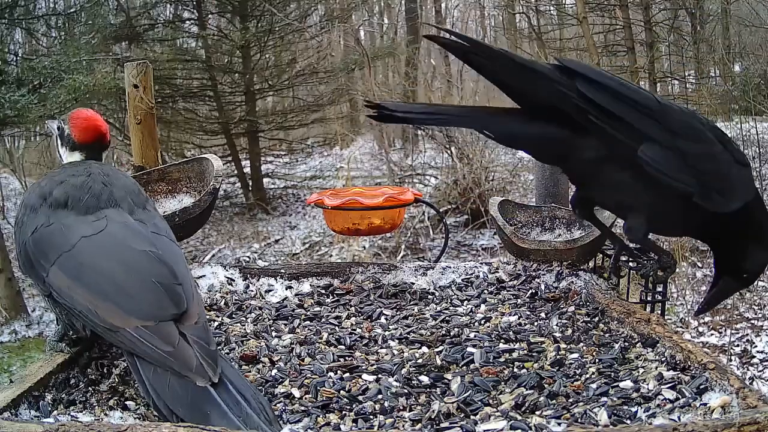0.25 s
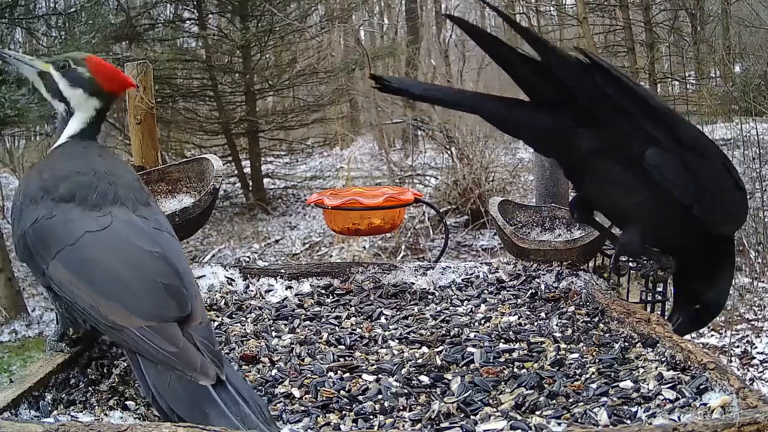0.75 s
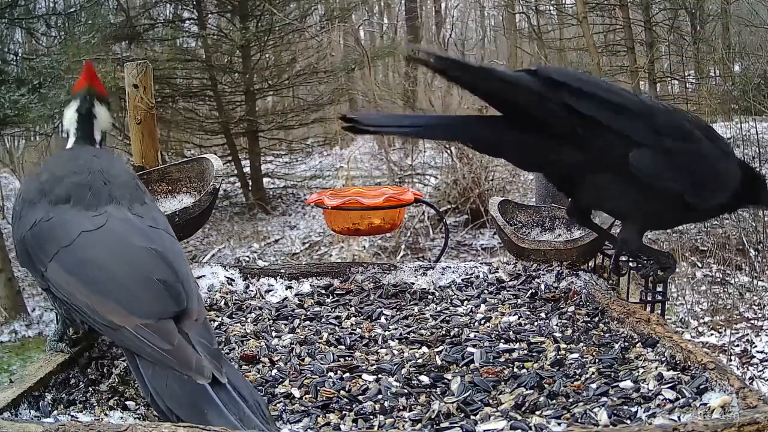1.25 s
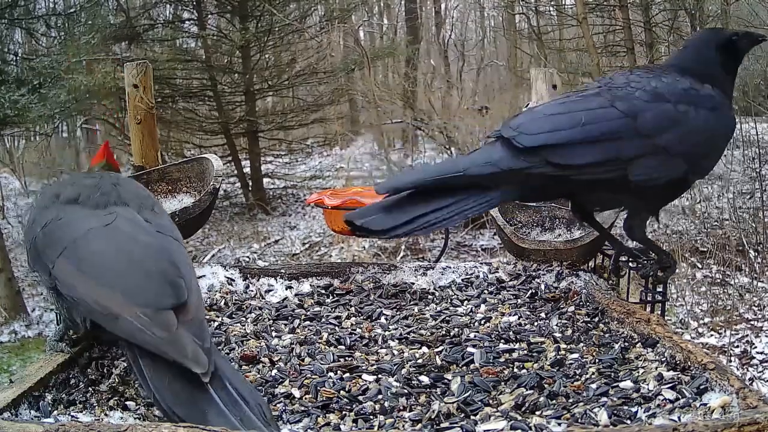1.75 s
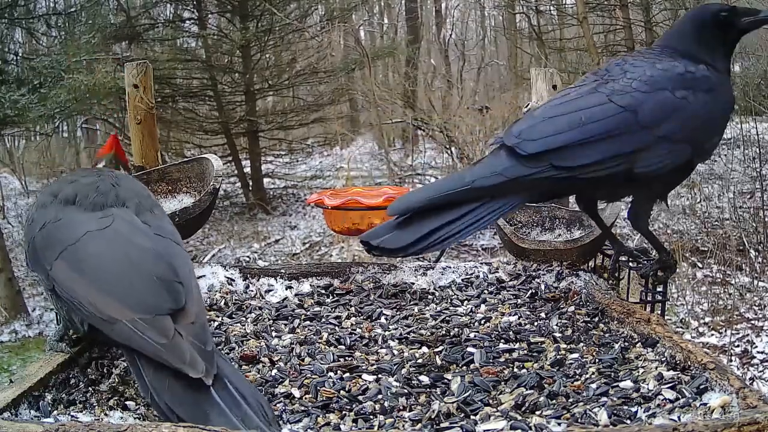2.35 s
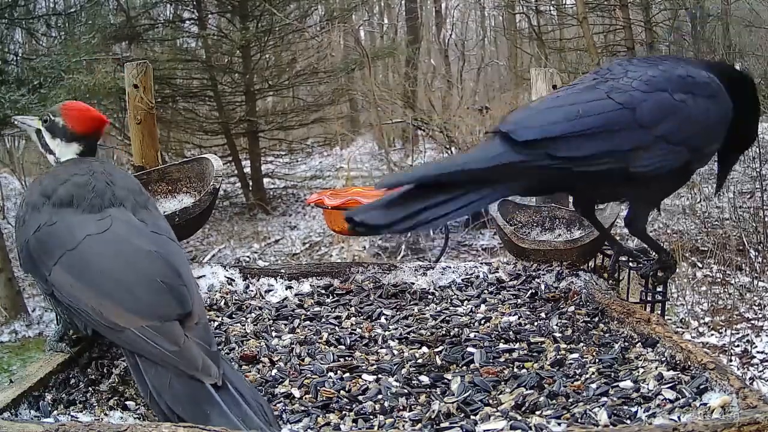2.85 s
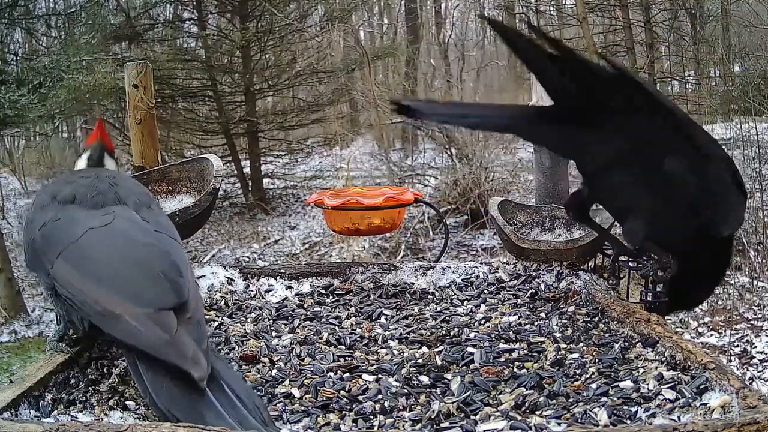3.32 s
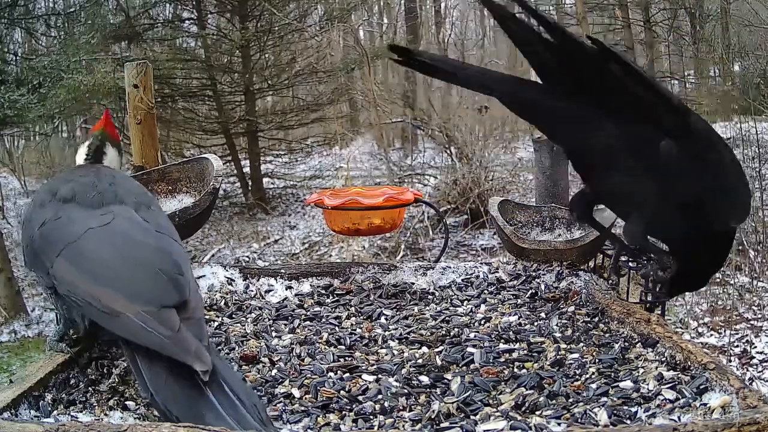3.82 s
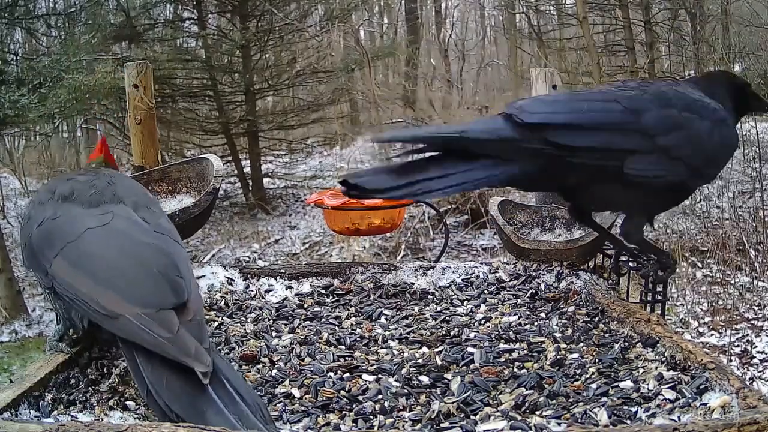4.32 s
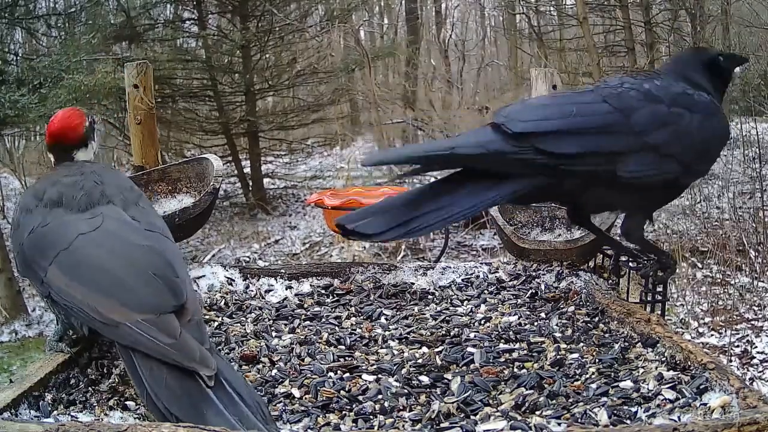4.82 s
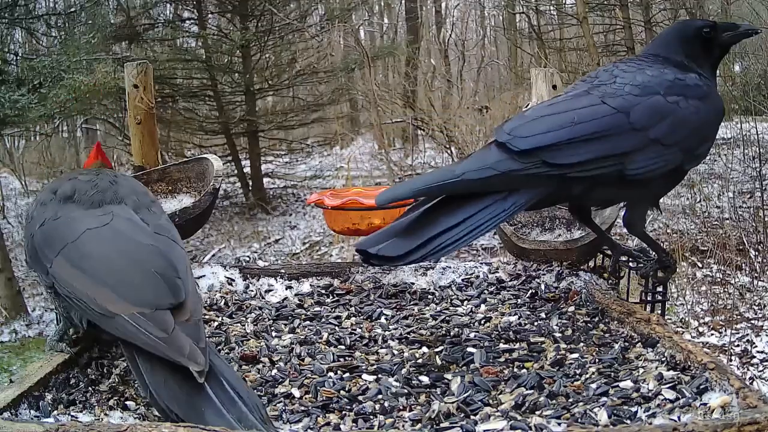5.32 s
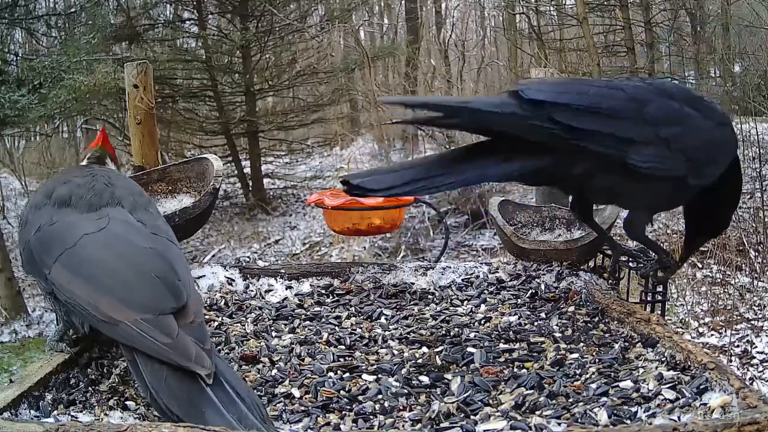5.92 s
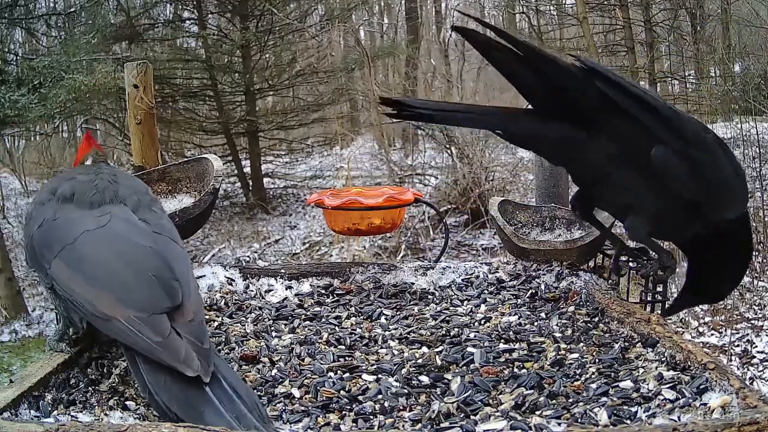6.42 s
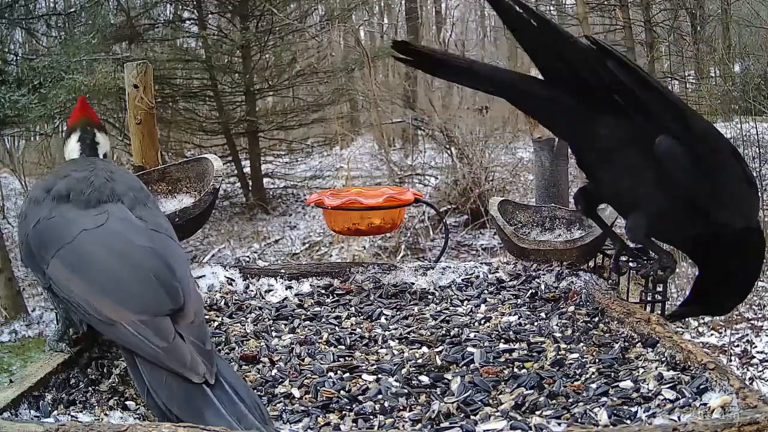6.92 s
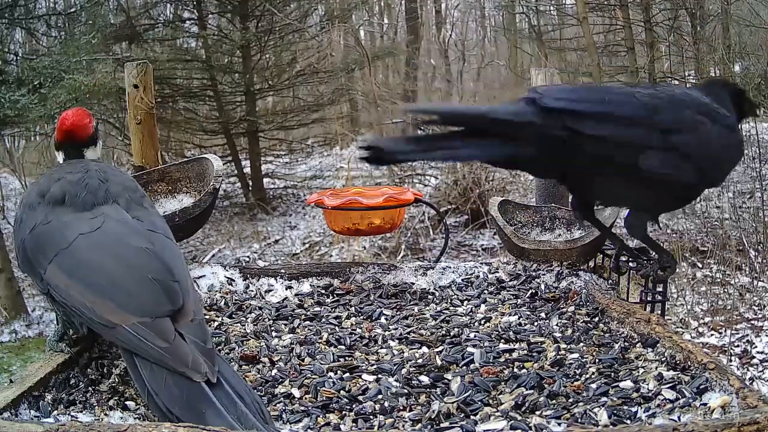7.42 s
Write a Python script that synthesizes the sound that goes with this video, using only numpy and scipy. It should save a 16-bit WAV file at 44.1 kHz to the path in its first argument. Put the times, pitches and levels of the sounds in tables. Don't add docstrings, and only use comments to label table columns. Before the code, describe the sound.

Close wooden pecks and loose rattling from a winter feeding platform come in uneven clusters, separated by quiet hiss, low rumble and tiny far-off chirps.

```python
import sys
import numpy as np
from scipy import signal
from scipy.fft import rfft, irfft, dct, next_fast_len
from scipy.io import wavfile
from scipy.ndimage import uniform_filter1d, map_coordinates

SR = 44100
rng = np.random.default_rng(int(sys.argv[2]) if len(sys.argv) > 2 else 0)


def waveform_to_disk(signal):
    frames = np.transpose(np.atleast_2d(signal))
    scaled = np.clip(frames, -1, 1) * 32767
    samples = np.round(scaled).astype(np.int16)
    wavfile.write(sys.argv[1], SR, samples)


def convert_level_to_amplitude(level_db):
    exponent = np.asarray(level_db, float) / 20
    return 10 ** exponent


N = 337806


def wobble(rate):
    knots = rng.standard_normal(int(N * rate / SR) + 4)
    return map_coordinates(knots, [np.arange(N) * rate / SR])


def coloured_noise(spectrum):
    m = next_fast_len(N + 8192)
    f, db = np.transpose(spectrum)
    log_hz = np.log(np.fft.rfftfreq(m, 1 / SR) + 1)
    gain = convert_level_to_amplitude(np.interp(log_hz, np.log(f + 1), db, -120, -120))
    x = irfft(rfft(rng.standard_normal(m)) * gain, m)[:N]
    return x / np.std(x)


def place(times, rows):
    at = np.round(np.asarray(times) * SR).astype(int)[:, None] + np.arange(rows.shape[1])
    return np.bincount(at.ravel(), rows.ravel(), N + SR)[:N]


def unfold(events, pattern, column):
    rows = []
    for event in events:
        for delay, *parts_db in pattern:
            rows.append((event[0] + delay, *(event[column] + np.array(parts_db))))
    return rows


def struck(events, groups, rise):
    s, *levels = np.transpose(events)
    t, rows = np.arange(SR // 2) / SR, 0
    for db, modes in zip(levels, groups):
        for hz, mode_db, t60 in modes:
            size, detune, turn = rng.standard_normal((len(s), 3)).T[:, :, None]
            swing = np.sin(2 * np.pi * hz * (1 + 0.014 * detune) * t + 1.01 * turn)
            build_up = 1 - np.exp(-(t * hz / rise) ** 2)
            decay = convert_level_to_amplitude(db[:, None] + mode_db + 1.35 * size - 60 * t / t60)
            rows = rows + decay * swing * build_up
    return place(s, rows)


# f/Hz, level/dB per Hz
TRAFFIC_SPECTRUM = [(88, -40), (150, 2), (194, -15), (281, 0.5), (322, -5.5), (364, -2.5), (461, -2.5),
                    (571, 0.5), (837, -16), (1340, -11.5), (1440, -9.5), (1620, -23), (2200, -36),
                    (2860, -56), (4840, -120)]


def far_traffic():
    level_db = -60.5 - 0.2663 * np.arange(N) / SR
    return convert_level_to_amplitude(level_db + 0.85 * wobble(4.775)) * coloured_noise(TRAFFIC_SPECTRUM)


# t/s, level/dB
POST_STIR = [(0.0, -49.5), (1.13, -49), (1.34, -41), (1.75, -55.5), (2.3, -52.5), (2.9, -52), (3.37, -46.5),
             (3.5, -43.5), (3.92, -49), (4.4, -52), (5.01, -51), (5.5, -52.5), (5.91, -52), (6.47, -48.5),
             (7.0, -49.5), (7.3, -53), (7.66, -50.5)]


def post_stir():
    s, db = np.transpose(POST_STIR)
    return np.interp(np.arange(N) / SR, s, db)


# f/Hz, level/dB per Hz
RUMBLE_SPECTRUM = [(18, -24), (30, 9), (43, -4.5), (97, -9), (139, -20.5), (160, -23), (250, -21.5),
                   (320, -47.5), (550, -120)]


def post_rumble(stir_db):
    return convert_level_to_amplitude(stir_db + 1.8 * wobble(9)) * coloured_noise(RUMBLE_SPECTRUM)


# f/Hz, level/dB per Hz
HISS_SPECTRUM = [(1000, -16), (1700, 0), (3350, -4), (5280, -4.5), (5590, -4.5), (6300, -4), (10300, -2.5),
                 (11400, -3.5), (12400, -4.5), (14800, -4.5), (15800, -13)]
# f/Hz, level/dB rms
CIRCUIT_TONES = [(9001, -89), (11999, -84)]


def circuit(stir_db):
    hiss_db = -72.5 + 0.1 * (stir_db - stir_db.mean())
    out = convert_level_to_amplitude(hiss_db + 0.39 * wobble(16.0)) * coloured_noise(HISS_SPECTRUM)
    for hz, db in CIRCUIT_TONES:
        out += convert_level_to_amplitude(db - 3 + 1.5 * wobble(4)) * np.sin(2 * np.pi * hz * np.arange(N) / SR)
    return out


# f/Hz, level/dB
CALL_PARTIALS = [(5750, -86), (6550, -89), (7300, -87), (14100, -91)]


def far_call():
    start_s, length_s = 0.71, 0.37
    t, partials = np.arange(N) / SR, 0
    swell = np.sin(np.pi * np.clip((t - start_s) / length_s, 0, 1))
    for hz, db in CALL_PARTIALS:
        phase = 2 * np.pi * np.cumsum(hz * (1 + 0.008 * wobble(30))) / SR
        partials = partials + convert_level_to_amplitude(db + 4 * wobble(40)) * np.sin(phase)
    return swell * partials


# t/s, level/dB
BIRD_TICKS = [(0.3531, -67), (0.713, -64), (1.0735, -67), (1.453, -70), (1.9804, -67), (2.1176, -64.5),
              (2.6504, -67), (3.024, -66), (3.043, -64), (3.058, -63), (3.7808, -67), (3.99, -67),
              (4.11, -66), (4.4193, -68.5), (4.7066, -69), (6.005, -70), (6.367, -60), (6.911, -70),
              (7.114, -68), (7.5228, -65.5)]


def small_bird():
    s, db = np.transpose(BIRD_TICKS)[:, :, None]
    t = np.arange(1024) / SR
    tone = np.sin(2 * np.pi * 5640 * t * (1 - 1.1 * t))
    puff = t / 0.0032 * np.exp(1 - t / 0.002)
    return place(s[:, 0] - 0.002, convert_level_to_amplitude(db + 4.0) * tone * puff)


# t/s, then contact, brightness, rocking, boards level/dB
STRIKE_EVENTS = [
    (1.3196, -30, -3, -31, -26.5),
    (3.2762, -32, 0.5, -32, -26),
    (3.5225, -31, -4, -27, -26.5),
    (4.7746, -32, -2, -29, -32),
]
REBOUND_EVENTS = [(.0664, -48, 4, -43, -41.5), (.7391, -36, -7, -46, -46.5),
                  (1.1361, -29.5, -3, -36.5, -41.5), (1.3557, -29, -1, -26, -34),
                  (3.0503, -32, -9, -32.5, -45.5), (3.3138, -27, 4, -23, -29.5),
                  (3.3289, -28, -3, -22.5, -44), (3.3584, -32, 1, -30.5, -38),
                  (3.56, -26.5, 1.5, -28.5, -35), (3.6459, -34.5, 3, -28.5, -41),
                  (4.8103, -27.5, -3, -25.5, -33.5)]
SCUFF_EVENTS = [
    (.05, -45.5, 3, -35.5, -31.5),
    (.3745, -43.5, -1.5, -33.5, -27),
    (.717, -45, 5, -30, -39.5),
    (1.1075, -48.5, 8, -33, -36),
    (3.0092, -39, 4, -28.5, -27),
    (3.628, -46, -2, -29, -37.5),
]
PECK_EVENTS = [
    (1.693, -55, 1, -50, -41),
    (6.3745, -39, -0.5, -41.5, -36.5),
    (6.6907, -40, -2, -37, -36),
]
# t/s, then sway, rocking, twist level/dB
WEIGHT_SHIFTS = [(.126, -46, -39, -48), (.788, -53, -42, -54), (1.095, -27.5, -37, -46),
                 (1.187, -50, -40, -59), (1.572, -26.5, -58, -72), (1.604, -41, -68, -70),
                 (1.746, -50, -56, -58), (1.805, -40, -58, -70), (3.282, -22, -18, -29.5),
                 (3.44, -73, -47, -60), (3.494, -47, -43, -54), (3.654, -31, -31, -41),
                 (3.689, -55, -39, -54), (3.838, -44, -47, -46), (5.829, -58, -49, -54),
                 (5.868, -49, -48, -51.5), (6.205, -66, -38.5, -49), (6.228, -44, -37, -52),
                 (6.25, -34, -34.5, -56), (6.285, -43, -42, -57), (6.39, -30, -42, -40.5),
                 (6.7, -54, -50, -38), (6.725, -32, -41, -46)]
# delay t/s, then sway, main, second, twist level/dB over its rocking
STRIKE_PUSHES = [
    (0.0018, 9, -2, 1, -5),
]
REBOUND_PUSHES = [
    (-.009, -16, 2, -6, -7.5),
    (.028, -16, -2.5, -9.5, -12),
]
SCUFF_PUSHES = [
    (-.002, 3, -2, -1.5, -4),
    (.04, -16, -3, -9.5, -8.5),
]
PECK_PUSHES = [
    (.002, 1, -1, -21, 0.5),
    (0.035, -18, -14, 3, -7.5),
]
# f/Hz, level/dB, t60/s
ROCKING_MODES = [
    [(36, 7.5, 0.13)],
    [(64.5, 2, 0.25)],
    [(93.76, -3, 0.36)],
    [(166.5, -1, 0.11), (193.5, -4.5, 0.18), (122.5, -1.5, 0.14)],
]


def rocking():
    pushes = []
    for s, sway_db, main_db, twist_db in WEIGHT_SHIFTS:
        pushes.append((s, sway_db, main_db, main_db - 4.5, twist_db))
    for events, pattern in ((STRIKE_EVENTS, STRIKE_PUSHES), (REBOUND_EVENTS, REBOUND_PUSHES),
                            (SCUFF_EVENTS, SCUFF_PUSHES), (PECK_EVENTS, PECK_PUSHES)):
        pushes += unfold(events, pattern, column=3)
    return struck(pushes, ROCKING_MODES, rise=0.38)


# t/s, then board, rim level/dB
DULL_THUDS = [(.112, -51, -67), (.501, -52, -55), (.778, -60, -60), (1.165, -69, -61), (1.414, -59, -52),
              (1.434, -49, -53), (1.818, -38.5, -67), (2.032, -53, -73), (3.657, -34.5, -62),
              (3.535, -45, -37.5), (3.58, -40, -53), (3.799, -42.5, -63), (5.244, -47, -68),
              (6.226, -44, -65)]
# delay t/s, then board, rim level/dB over its boards level
STRIKE_KNOCKS = [
    (-.003, -3.5, -15),
    (.006, 0, -9.5),
    (.022, -5.5, -25.5),
]
REBOUND_KNOCKS = [
    (-.002, -17, 2),
    (.008, -21, -7),
    (.02, -4.5, -5),
]
SCUFF_KNOCKS = [
    (.003, -7, -12.5),
    (.013, 1, -8.5),
    (.029, -7, -19.5),
]
PECK_KNOCKS = [
    (.005, -0.5, -9.5),
    (0.017, -3, -10.5),
]
# f/Hz, level/dB, t60/s
BOARD_MODES = [
    [(335.1, -2, 0.11), (288, -18.5, 0.13), (393.3, -4.5, 0.045)],
    [(466.5, 4, 0.026), (550.6, 1, 0.042), (634, -6.5, 0.038), (725, -6.5, 0.024)],
]


def knocking():
    knocks = list(DULL_THUDS)
    for events, pattern in ((STRIKE_EVENTS, STRIKE_KNOCKS), (REBOUND_EVENTS, REBOUND_KNOCKS),
                            (SCUFF_EVENTS, SCUFF_KNOCKS), (PECK_EVENTS, PECK_KNOCKS)):
        knocks += unfold(events, pattern, column=4)
    return convert_level_to_amplitude(2.5) * struck(knocks, BOARD_MODES, rise=0.76)


# delay t/s, then housing, mount, grille, crack level/dB over its contact
STRIKE_CONTACTS = [
    (-.0055, -10, -45, -30, -67),
    (0, -1, 0, -1, -14),
    (.007, -13.5, -37, -41, -40),
    (0.012, -16, -24, -17, -22),
    (0.0228, -0.5, -1, -2.5, -19.5),
]
REBOUND_CONTACTS = [
    (-.006, -15.5, -50, -27, -26.5),
    (0, 0.5, -14, -10, -31.5),
    (.006, -21, -15, -48, -57),
    (.02, -24, -42, -33.5, -38),
    (0.035, -28, -38, -37, -45),
]
SCUFF_CONTACTS = [
    (0, -9, -22, -19, -21),
    (.005, 0, -16.5, -13.5, -27),
    (.011, -4, -17.5, -20, -32),
    (.017, -2.5, -26, -40, -25),
    (0.024, -5, -20, -18, -28),
]
PECK_CONTACTS = [
    (0, -3.5, -9.5, -16, -15.5),
    (.0052, -3, -19, -21.5, -18),
    (.012, -8, -22, -27, -29),
    (0.025, -17.5, -26, -23.5, -26),
]
# t/s, contact and brightness level/dB, grille level/dB over its usual share
STRAY_CONTACTS = [(0.0655, -53.5, 4, 16), (0.0792, -44.5, -4, -3), (.7894, -68, 10, 3), (1.0956, -56, 5, 1),
                  (1.361, -39, 9.5, 2), (1.392, -70, 6, 4), (1.41, -59, -2, 0), (1.694, -63, 3, 9),
                  (2.0182, -57, -6, 15), (2.169, -71, -20, 21), (2.7472, -70, 9.5, 6), (3.127, -64, 4, -4),
                  (3.2905, -30.5, 6, -2), (3.3171, -35, 14, -10), (3.3227, -37, 0, -3),
                  (3.3484, -53, 19, -3), (3.365, -40.5, 16, 0), (3.377, -54, -1, 10), (3.567, -52, 3, 0),
                  (3.578, -54, -1, 15), (3.5876, -55, 15, 2), (3.598, -56, 0, 3), (3.615, -53, -4, 4),
                  (3.6587, -39, 5.5, -15), (3.816, -57.5, 1.5, 5), (3.8935, -68, 4, -1),
                  (4.8174, -50, 15, -1), (6.2063, -57.5, 4, -1), (6.2253, -59, -2, 5),
                  (7.3846, -56, -10, 0)]
# mount, grille, crack level/dB
STRAY_SHARES = (-10.5, -11.5, -27.5)


def contacts():
    rows = []
    for events, pattern in ((STRIKE_EVENTS, STRIKE_CONTACTS), (REBOUND_EVENTS, REBOUND_CONTACTS),
                            (SCUFF_EVENTS, SCUFF_CONTACTS), (PECK_EVENTS, PECK_CONTACTS)):
        for s, db, bright_db, *_ in events:
            for delay, housing_db, *upper_db in pattern:
                rows.append((s + delay, db + housing_db, *(db + bright_db + np.array(upper_db))))
    mount_db, grille_db, crack_db = STRAY_SHARES
    for s, db, bright_db, extra_db in STRAY_CONTACTS:
        upper = db + bright_db
        rows.append((s, db, upper + mount_db, upper + extra_db + grille_db, upper + crack_db))
    return rows


# f/Hz, width f/Hz, level/dB
HOUSING_PEAKS = [(1059, 76, 1.5), (1276, 59, 4), (1490, 220, -4.5)]
MOUNT_PEAKS = [(1793, 350, 1.5), (2398, 230, 5)]
GRILLE_PEAKS = [(2636, 235, -3.5), (3122, 162, 3), (3490, 380, -5)]
CRACK_PEAKS = [(5610, 2900, -1.5), (8600, 770, 3.5), (9140, 4300, -4.5)]


def chatter():
    s, *levels = np.transpose(contacts())
    size = 8192
    t, f, rows = np.arange(size) / SR, np.fft.rfftfreq(size, 1 / SR), 0
    # peaks, t60/s, gain/dB
    parts = ((HOUSING_PEAKS, 0.024, 1.6), (MOUNT_PEAKS, 0.027, 1.23),
             (GRILLE_PEAKS, 0.027, 3.7), (CRACK_PEAKS, 0.03, 8.1))
    for db, (peaks, t60, gain_db) in zip(levels, parts):
        fade = convert_level_to_amplitude(-60 * t / t60) + convert_level_to_amplitude(-16 - 60 * t / 0.05) + convert_level_to_amplitude(-33 - 60 * t / 0.45)
        force = rng.standard_normal((len(s), size)) * fade * (1 - np.exp(-t / 0.00036))
        force[:, 20] += 11
        mix_db = 1.45 * rng.standard_normal((len(s), len(peaks))).T[:, :, None]
        body = 0
        for k, (centre, width, peak_db) in enumerate(peaks):
            resonance = 1j * f * width / (centre * centre - f * f + 1j * f * width)
            body = body + (-1) ** k * convert_level_to_amplitude(peak_db + mix_db[k]) * resonance
        no_bass = (1j * f / (1j * f + 0.38 * peaks[0][0])) ** 2
        no_top = 1 / (1 + 1j * f / (1.6 * peaks[-1][0])) ** 3
        ring = irfft(rfft(force) * body * no_bass * no_top)
        rows = rows + ring / np.abs(ring).max(1, keepdims=True) * convert_level_to_amplitude(db[:, None] + gain_db)
    return place(s - 0.0005, rows)


def scene():
    stir_db = post_stir()
    background = far_traffic() + post_rumble(stir_db) + circuit(stir_db)
    birds = far_call() + small_bird()
    return (background + birds + rocking() + knocking() + chatter())[None]


THINNED_MOMENTS = [4, 54, 70, 103, 124, 149, 157, 190, 200, 205, 207, 211, 218, 238, 248, 254, 270, 282,
                   323, 331, 338]


def treble_dropouts(sound):
    step_s, first_s = 1024 / 48000, 0.0083
    size = round(2 * step_s * SR)
    window = np.sin(np.pi * (np.arange(size) + 0.5) / size) ** 2.0
    start = first_s + (np.array(THINNED_MOMENTS) - 1) * step_s
    at = np.round(start * SR).astype(int)[:, None] + np.arange(size)
    lines = dct(sound[0][at] * window, norm="ortho")
    hz = np.arange(size) * SR / 2 / size
    treble = hz > 1900
    threshold = 1.35 * np.std(lines[:, treble & (hz < 15000)], axis=1, keepdims=True)
    weak = (uniform_filter1d(np.abs(lines), size=5, axis=1) < threshold) & treble
    lost = dct(lines * weak, type=3, norm="ortho") * window
    return sound - place(start, lost)


def band_limit(x):
    return signal.sosfilt(signal.butter(12, 15820, fs=SR, output="sos"), x)


def record(dry):
    dry = signal.sosfilt(signal.butter(3, 37, "high", fs=SR, output="sos"), dry)
    dry = signal.sosfilt(signal.cheby2(14, 40, 16250, fs=SR, output="sos"), dry)
    mix = treble_dropouts(dry)
    return band_limit(mix)


dry = scene()
out = record(dry)
waveform_to_disk(out)
```